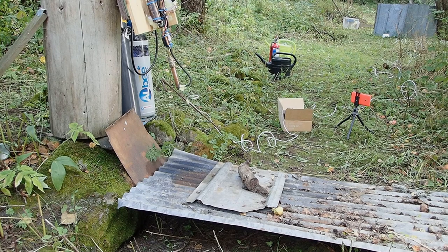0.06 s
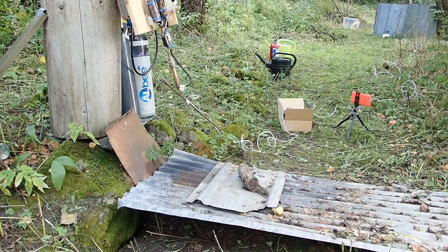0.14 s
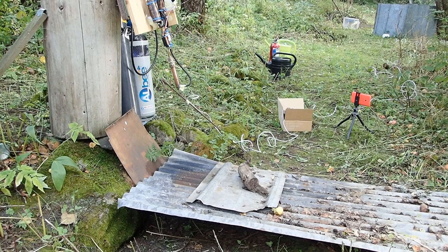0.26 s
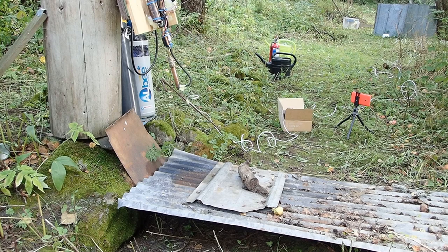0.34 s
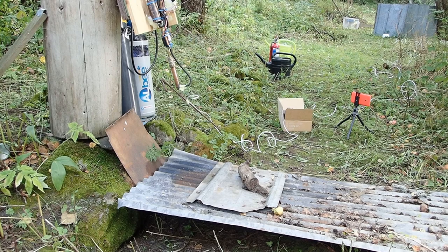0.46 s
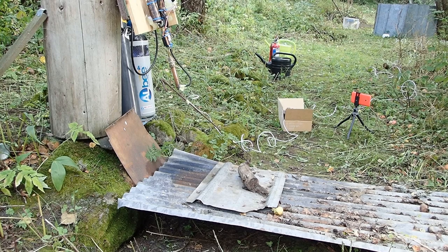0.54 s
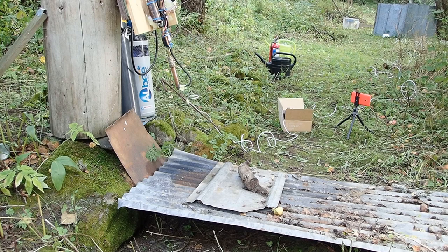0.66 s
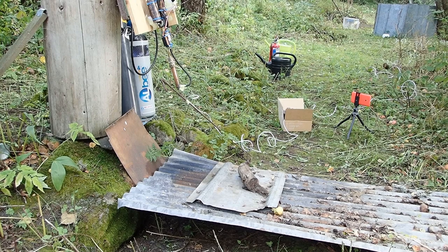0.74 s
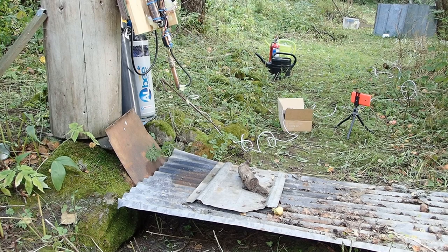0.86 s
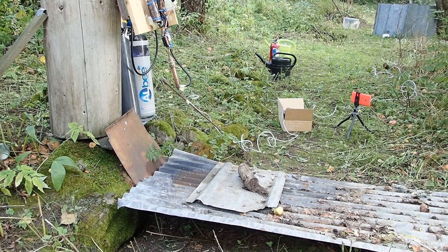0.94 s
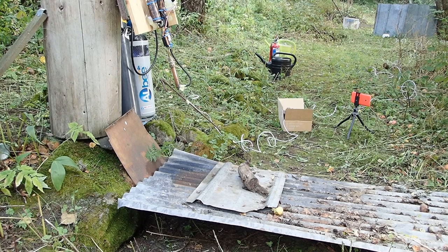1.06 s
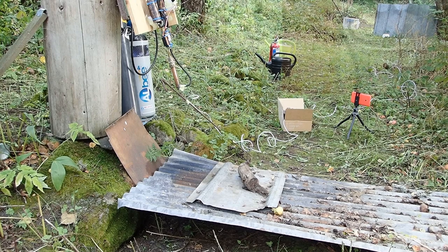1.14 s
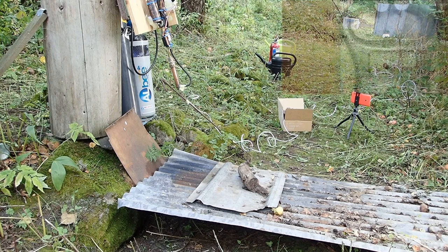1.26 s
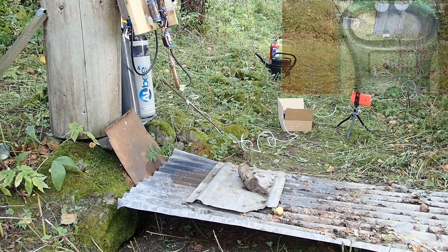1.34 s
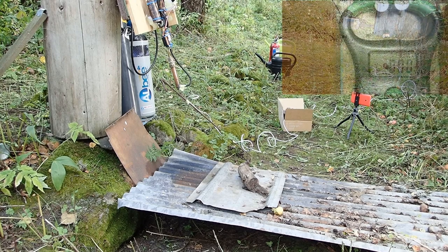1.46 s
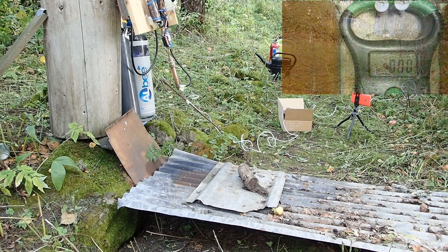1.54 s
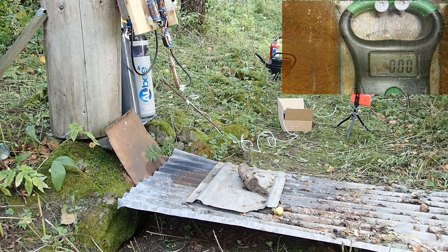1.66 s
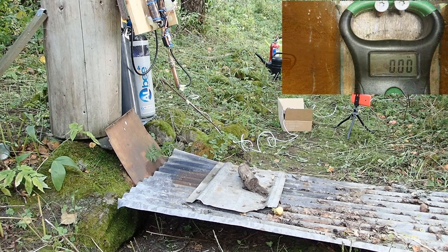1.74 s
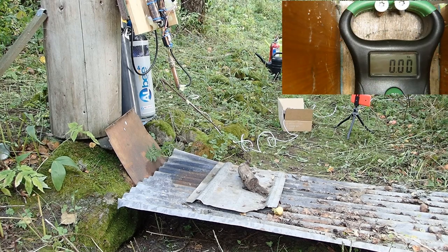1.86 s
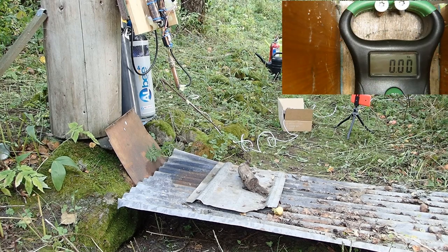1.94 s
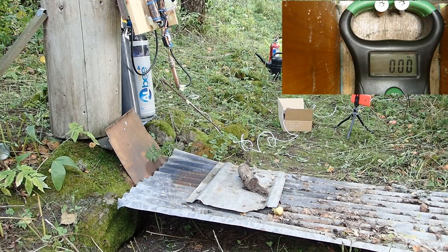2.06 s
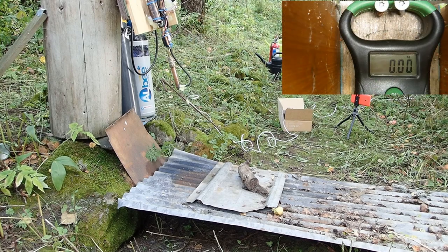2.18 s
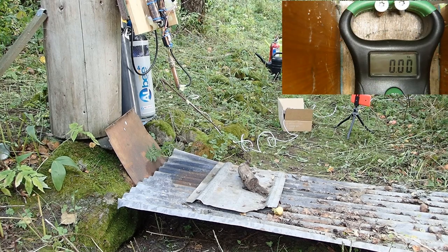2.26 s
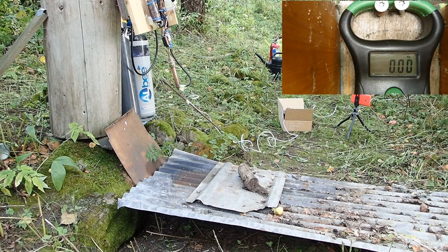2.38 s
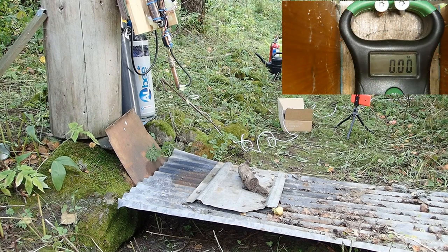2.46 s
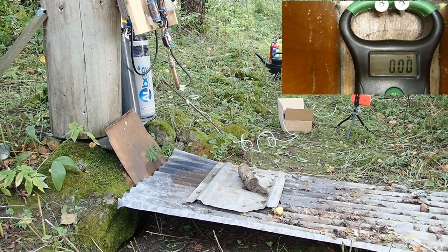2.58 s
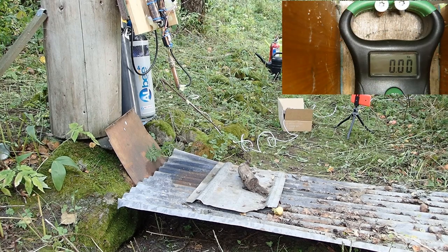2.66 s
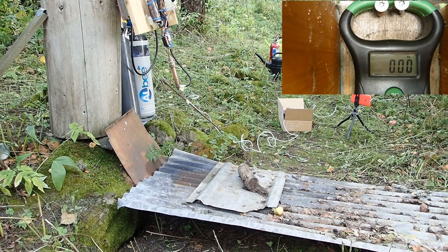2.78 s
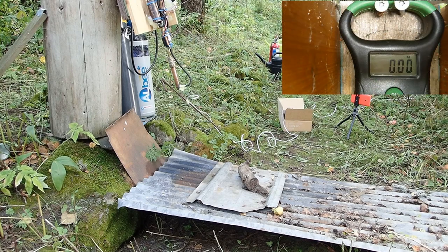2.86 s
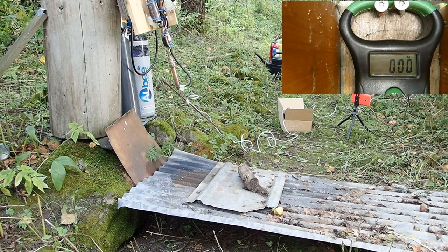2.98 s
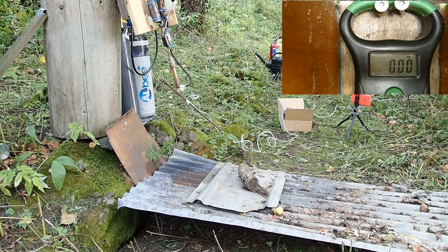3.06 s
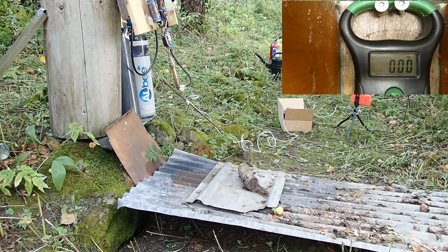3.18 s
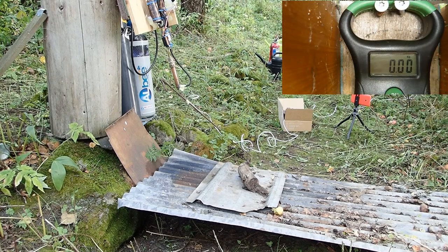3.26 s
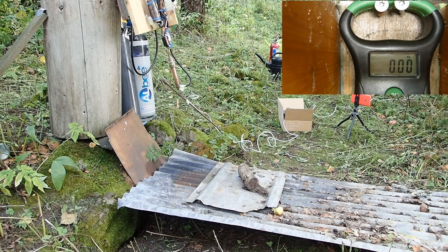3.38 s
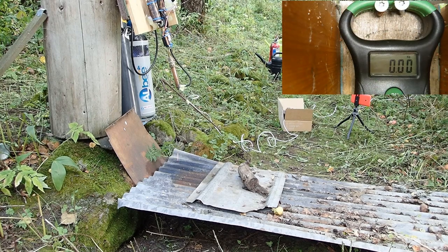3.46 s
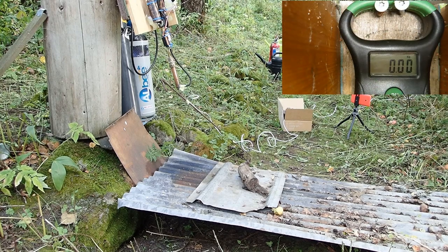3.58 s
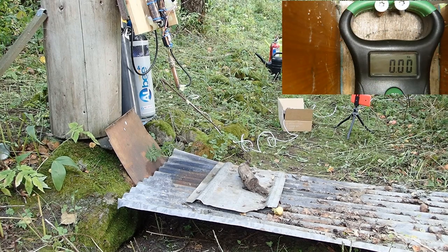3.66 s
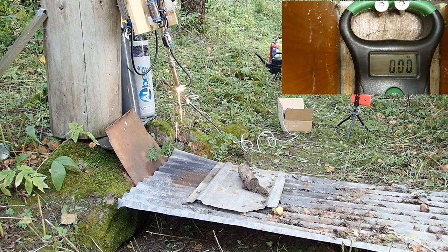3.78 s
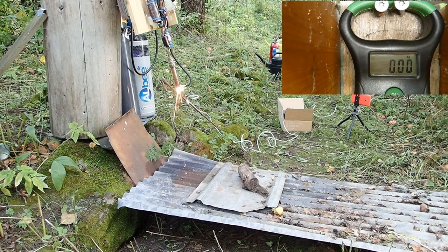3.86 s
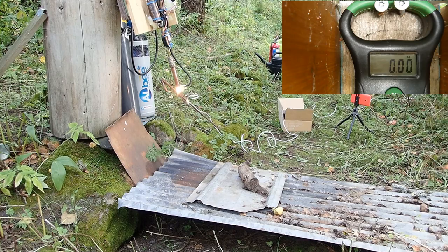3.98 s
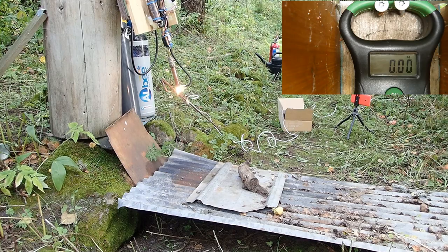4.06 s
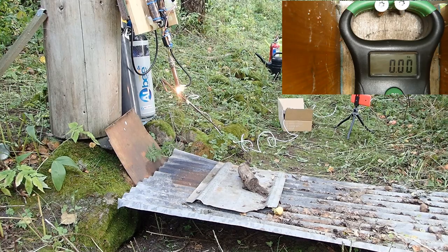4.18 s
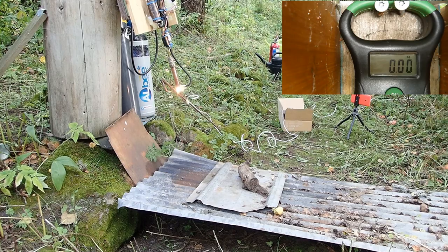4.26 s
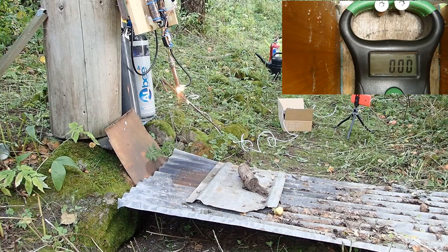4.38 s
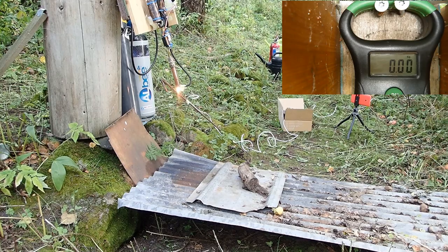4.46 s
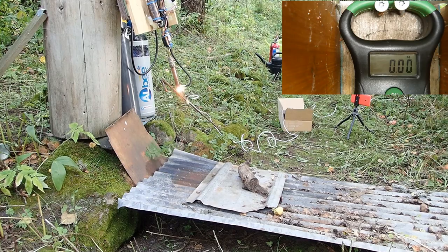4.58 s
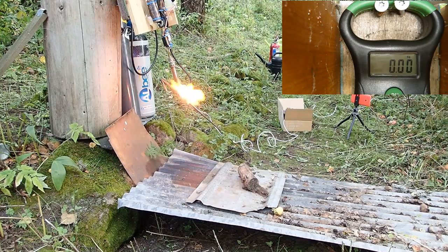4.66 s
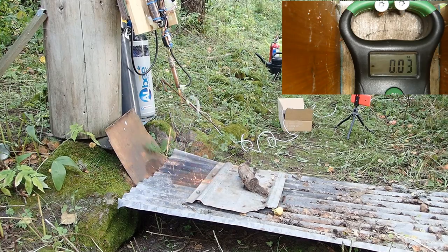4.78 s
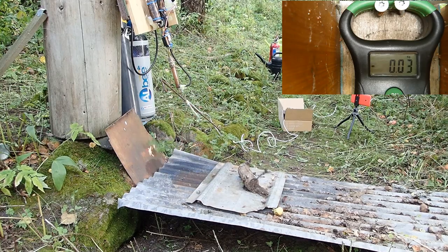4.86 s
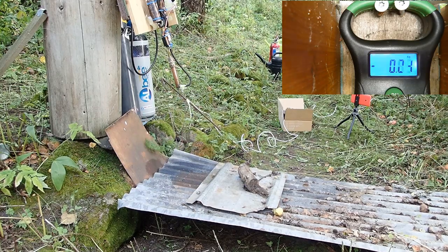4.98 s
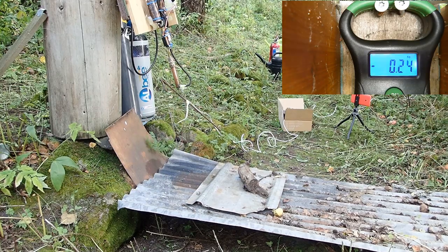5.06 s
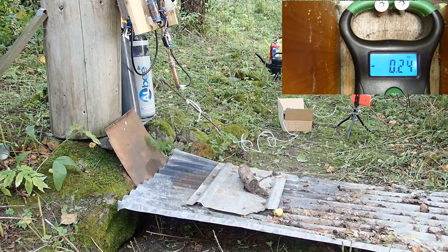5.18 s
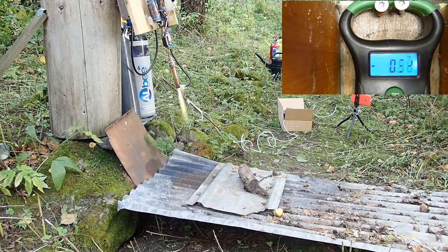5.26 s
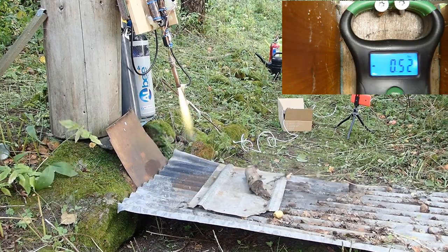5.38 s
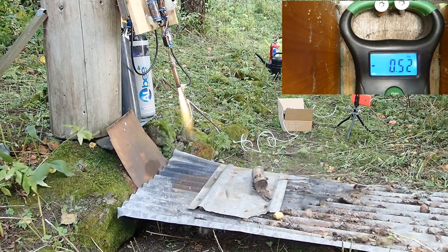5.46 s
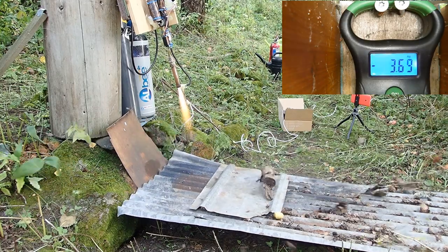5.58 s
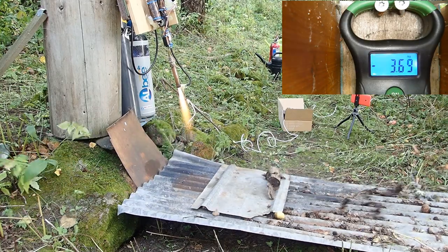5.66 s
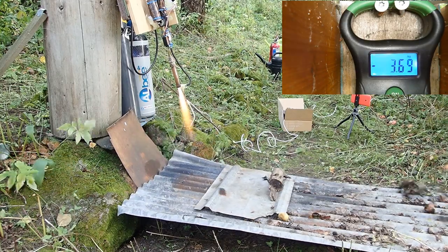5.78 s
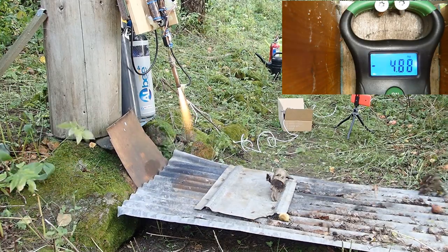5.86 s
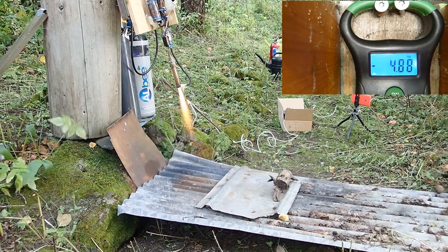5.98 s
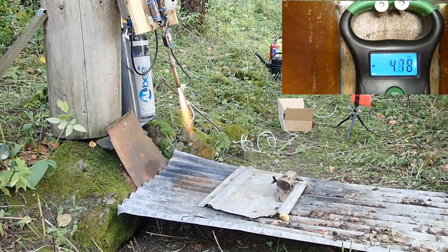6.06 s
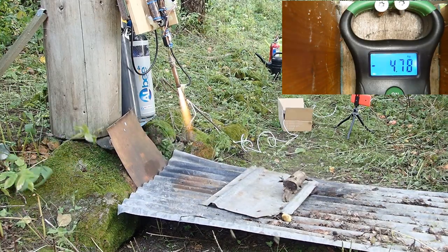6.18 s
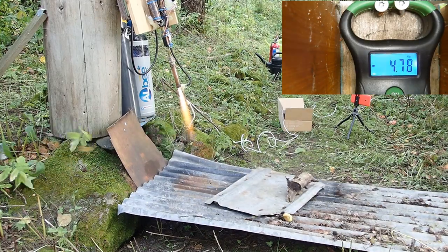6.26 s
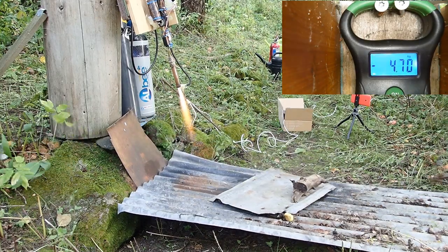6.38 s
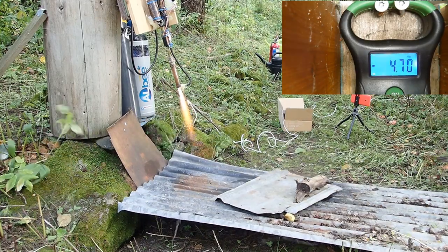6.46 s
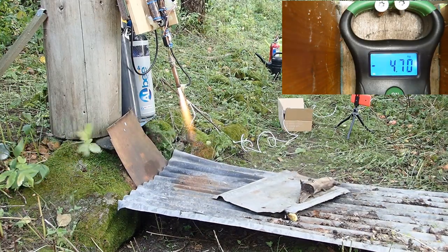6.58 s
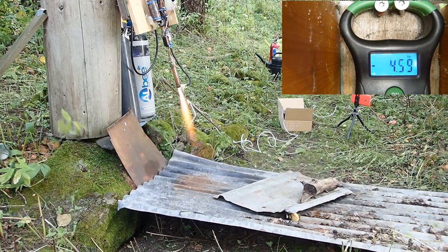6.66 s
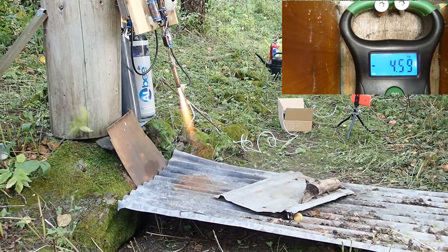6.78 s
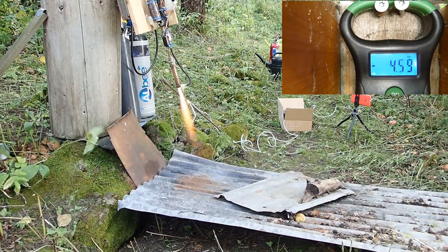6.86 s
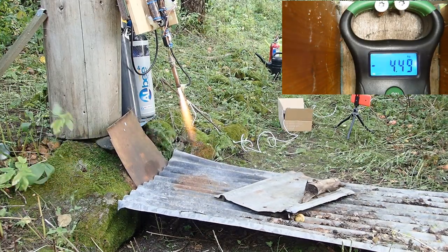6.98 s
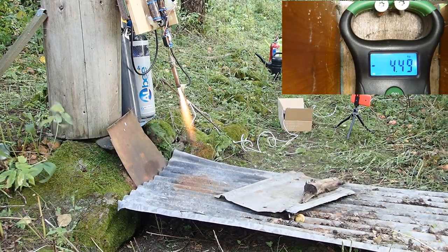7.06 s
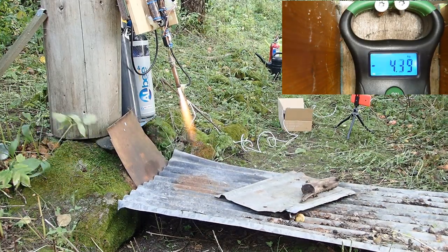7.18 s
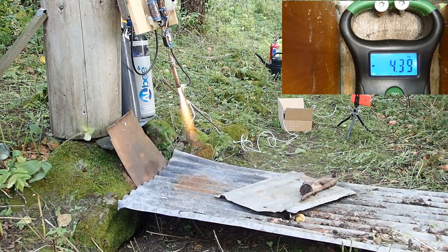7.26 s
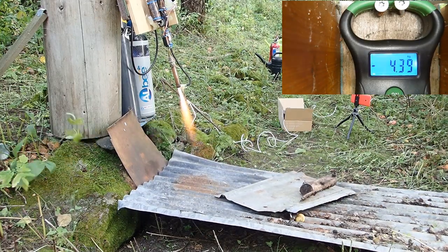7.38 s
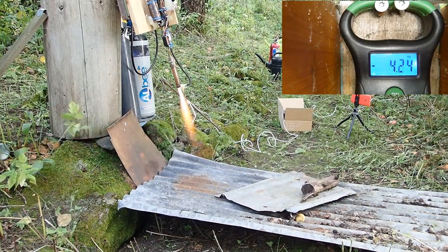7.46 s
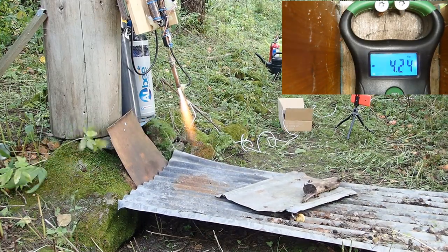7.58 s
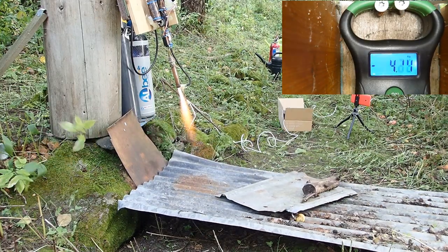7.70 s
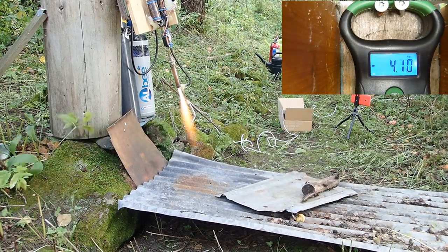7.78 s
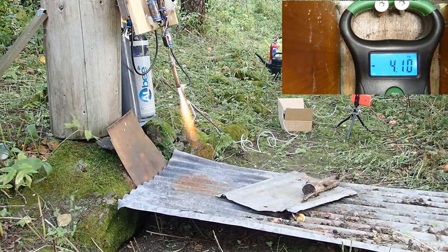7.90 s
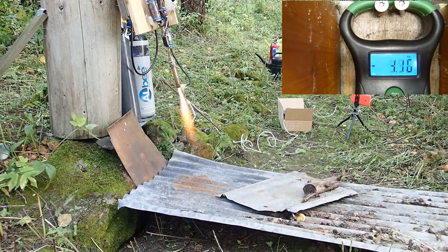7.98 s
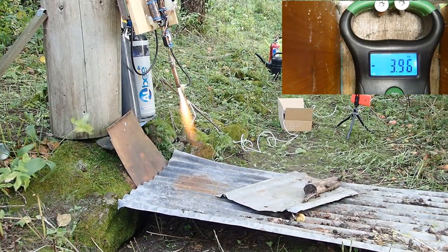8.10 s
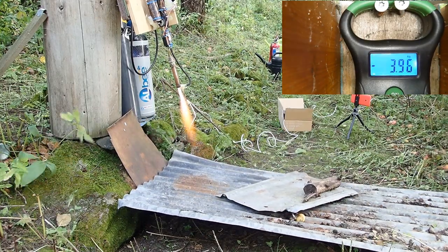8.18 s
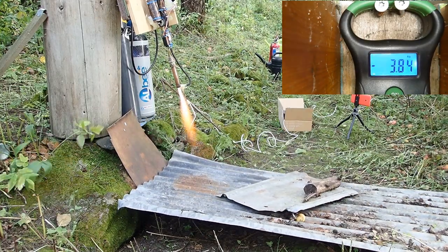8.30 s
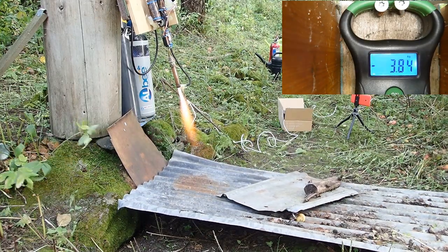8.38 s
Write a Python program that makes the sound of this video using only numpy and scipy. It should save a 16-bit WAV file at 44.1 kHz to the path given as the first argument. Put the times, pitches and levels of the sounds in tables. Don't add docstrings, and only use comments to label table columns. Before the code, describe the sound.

Outdoors in a garden, soft wind rumble and a thin camera-motor whine. A bright, resonant gas hiss opens abruptly and holds, then shifts upward into a hollow, unstable howl. A hard pop is followed by sputtering flame, a rising whistle and sharp cracks, then rapid chugging. It settles into a loud, bright jet roar with a falling tone. Stereo microphone a few metres away.

```python
import sys
import numpy as np
from scipy import signal
from scipy.io import wavfile
from scipy.ndimage import uniform_filter1d, map_coordinates

SR = 44100
rng = np.random.default_rng(int(sys.argv[2]) if len(sys.argv) > 2 else 0)


def invert_db(x):
    u = np.asarray(x, float) / 20
    return 10 ** u


def file_out(sig):
    cols = np.atleast_2d(sig).T
    lim = np.clip(cols, -1, 1)
    pcm = np.round(lim * 32767).astype(np.int16)
    wavfile.write(sys.argv[1], SR, pcm)


N = 371763
FRAME = 1024

# freq_hz, density_db
JET_SPECTRUM = [(1350, -20), (2300, -20.5), (3120, -27.5), (3440, -21), (4130, -21), (4740, -9.5),
                (5340, -4), (6330, -2), (7430, -6), (8650, 0), (9450, -4.5), (10600, -16.5), (14100, -15.5),
                (15700, -22.5)]
# freq_hz, density_db
BODY_SPECTRUM = [(410, -11), (700, -5.5), (882, -6.5), (1000, 3.5), (1090, 3), (1440, 5), (1910, -2),
                 (2070, -2), (2390, -25.5), (3000, -20.5), (3900, -10.5), (6600, -120)]
# freq_hz, coherence
PORT_COHERENCE = [(60, 0.08), (130, 0.19), (290, 0.87), (640, 0.86), (1410, 1.0), (3100, 0.94),
                  (6820, 0.66), (15000, 0.39)]


def unit(x):
    return x / np.sqrt(np.mean(x ** 2) + 1e-20)


def along(points, hz):
    f, v = np.transpose(points)
    return np.interp(np.log(hz + 1), np.log(f + 1), v)


def curves(rows, fade=0.0045):
    s, *columns = np.transpose(rows)
    t = np.arange(N) / SR
    gate = np.clip(np.minimum(t - s[0], s[-1] - t) / fade + 1, 0, 1)
    return [gate] + [np.interp(t, s, column) for column in columns]


def wobble(rate, size=16):
    knots = rng.standard_normal(int(N * rate / SR) + 4)
    coarse = map_coordinates(knots, [np.arange(0, N + size, size) * rate / SR])
    return np.interp(np.arange(N) / size, np.arange(len(coarse)), coarse)


def rush(power, alike, patchy_db=0.0, gate=None):
    # freq_hz, left_lead_rad
    phase_lead = [(0, 0), (600, 0.1), (4390, 0.0), (5250, 0.6), (8440, 0.5), (14200, 1.4), (15400, 0.2)]
    # freq_hz, left_minus_right_db
    balance = [(60, -5.5), (180, -2.5), (550, 0), (1650, 0.0), (4970, 0.5), (15000, 2.5)]
    start, end = (0, N) if gate is None else np.flatnonzero(gate)[[0, -1]]
    hz, t, z = signal.stft(rng.standard_normal((2, end - start)), SR, nperseg=FRAME)
    at = np.minimum(start + t * SR, N - 1).astype(int)
    shape = power(hz[:, None], at) * np.ones(z.shape[1:])

    patches = uniform_filter1d(rng.standard_normal(shape.shape), 10, 0)
    patches = uniform_filter1d(patches, 6, 1)
    z = z * np.sqrt(shape / shape.mean(0)) * invert_db(patchy_db * unit(patches))

    lead_rad = along(phase_lead, hz)
    coherence = along(alike, hz) / np.maximum(np.cos(lead_rad), 0.4)
    angle = np.arccos(np.clip(coherence, -1, 1))[:, None] / 2
    mid, side = z[0] * np.cos(angle), z[1] * np.sin(angle)
    tilt = (invert_db(along(balance, hz) / 2) * np.exp(0.5j * lead_rad))[:, None]
    stereo = np.array([(mid + side) * tilt, (mid - side) / tilt])
    pair = signal.istft(stereo, SR, nperseg=FRAME)[1][:, :end - start]
    return np.pad(pair, ((0, 0), (start, N - end)))


def steady(spectrum):
    return lambda hz, at: invert_db(along(spectrum, hz)) ** 2 * np.minimum(hz / spectrum[0][0], 1) ** 6


def peak(hz, centre, width, steep=1.88):
    return 1 / (1 + (2 * (hz - centre) / width) ** 2) ** steep


def singing(hz, width, steadiness):
    sway = steadiness + wobble(width) + 1j * wobble(width)
    phase = 2 * np.pi * np.cumsum(hz * np.ones(N)) / SR
    return unit(np.real(sway * np.exp(1j * phase)))


def flame():
    # start_s, jet_db, outer_db
    thrust = [(3.87, -23.5, -3), (3.93, -32.5, 0.5), (4.06, -27, 1), (4.25, -17.5, 0.5), (4.48, -11.5, -6),
              (4.6, -11, -11.5), (4.7, -11.5, -13), (4.8, -10.5, -18), (4.97, -14.5, -21.5),
              (5.13, -17.5, -18), (5.165, -17.5, -29), (5.24, -18, -30), (5.3, -15, -28),
              (5.385, -13.5, -22), (5.402, -8, -12.5), (5.57, -14, -14), (6.78, -14, -12.5),
              (8.43, -14, -12.5)]
    # freq_hz, density_db
    low_spectrum = [(150, -54), (250, -18), (446, -9), (730, -11), (858, -4), (900, -5.5), (1170, -30),
                    (1980, -120)]
    # freq_hz, density_db
    bass_spectrum = [(29, -40), (50, -13.5), (215, -0.5), (248, -4), (330, -4), (430, -5), (730, -120)]
    # freq_hz, coherence
    jet_coherence = [(60, 0.13), (130, 0.53), (290, 0.46), (640, 0.76), (1410, 0.93), (3100, 0.82),
                     (6820, 0.59), (15000, 0.24)]
    # start_s, pulses_per_s
    chug_rate = [(4.71, 43), (4.83, 73), (4.93, 85), (5.06, 101), (5.14, 96), (5.25, 72)]
    # start_s, pitch_hz, level_db
    screech_glide = [(4.9, 6460, -25), (4.98, 6830, -14.5), (5.05, 6360, -14), (5.13, 6640, -15),
                     (5.2, 6900, -19), (5.26, 6900, -43)]
    # start_s, level_db
    afterflow = [(3.88, -53), (3.95, -47), (4.1, -39), (4.3, -42), (4.5, -47)]
    t = np.arange(N) / SR
    gate, jet_db, outer_db = curves(thrust)
    seated = t > 4.71

    def flicker():
        depth_db = np.where(t < 5.4, 3, 1)
        return depth_db * wobble(35)

    body_db = jet_db + outer_db
    under_db = body_db + np.where(seated, -0.39 * (outer_db + 13), 0.8 * outer_db)
    low_db = under_db + np.where(seated, -6, -15.5) + flicker()
    bass_db = under_db + np.where(seated, -12, -25.5) + flicker()

    chug_depth = 0.35
    chugging, rate = curves(chug_rate, fade=0.02)
    cycle = np.cumsum(rate * (1 + 0.012 * wobble(30))) / SR % 1
    puff = np.exp(-cycle / 0.14) - 0.2
    chop = 1 + chugging * chug_depth * puff
    crackle = invert_db(0.38 * wobble(300) + 0.38 * wobble(60) + 0.12 * wobble(7.1))

    dull_db = 0.72 * np.clip(jet_db + 17.5, -14, 0)

    def jet_power(hz, at):
        return steady(JET_SPECTRUM)(hz, at) * invert_db(2 * dull_db[at] * np.log2(hz / 6500 + 0.4))

    def low_power(hz, at):
        hum = invert_db(2 * 9.5) * peak(hz, 330, 53)
        return steady(low_spectrum)(hz, at) * (1 + ~seated[at] * hum)

    jet = invert_db(jet_db) * crackle * chop ** 2.5 * rush(jet_power, jet_coherence, gate=gate)
    body_level = invert_db(body_db + 0.25 * wobble(90) + 0.17 * flicker())
    body = body_level * crackle * chop ** 3 * rush(steady(BODY_SPECTRUM), jet_coherence, gate=gate)
    low = invert_db(low_db) * chop ** 3 * rush(low_power, jet_coherence, gate=gate)
    bass_level = invert_db(bass_db) * (1 - 0.35 * chugging * chug_depth)
    bass = bass_level * rush(steady(bass_spectrum), jet_coherence, gate=gate)

    band = signal.butter(2, [130, 650], "band", fs=SR, output="sos")
    thump = chugging * invert_db(-41 + 0.2 * (rate - 101)) * unit(signal.sosfilt(band, puff))

    on, screech_hz, screech_db = curves(screech_glide)
    screech = rush(lambda hz, at: peak(hz, screech_hz[at], 643), jet_coherence, gate=on)
    screech = on * invert_db(screech_db) * chop ** 2 * screech
    flowing, hiss_db = curves(afterflow)
    injector = rush(lambda hz, at: peak(hz, 13600, 1100, steep=1.1), PORT_COHERENCE, gate=flowing)
    injector = flowing * invert_db(hiss_db) * injector
    return gate * (jet + body + low + bass) + thump + screech + injector


def chamber():
    # start_s, pitch_hz, level_db
    first_mode = [(5.38, 974, -43), (5.42, 950, -19), (5.52, 915, -33), (5.7, 905, -29), (6.15, 961, -29),
                  (6.5, 929, -28), (7.2, 880, -27), (7.55, 851.5, -21), (8.43, 770, -24.5)]
    lit, pitch_hz, level_db = curves(first_mode)

    def power(hz, at):
        second = invert_db(2 * -2) * peak(hz, 1.953 * pitch_hz[at], 136)
        return peak(hz, pitch_hz[at], 90) + second

    fuzz = rush(power, PORT_COHERENCE, gate=lit)
    tone = singing(pitch_hz, 80, steadiness=6)
    return lit * invert_db(level_db) * (0.68 * fuzz + 0.5 * tone)


def pops():
    # start_s, peak_db, crack_db, t60_s
    bursts = [
        (3.866, 6, 1, 0.017),
        (4.162, -12, -11, 0.02),
        (4.171, -8, -11, 0.023),
        (4.214, -14, -12, 0.018),
        (4.562, -4.5, -13, 0.05),
        (4.749, -4.5, 0, 0.026),
        (4.774, -9, -5, 0.023),
        (4.855, -12.5, -5, 0.072),
        (4.898, -11.5, 5, 0.035),
        (4.956, -22, 5, 0.02),
    ]
    out = np.zeros((2, N))
    age = np.arange(SR // 10) / SR
    gate = curves([(bursts[0][0], 0), (bursts[-1][0] + 0.2, 0)])[0]
    knock = rush(steady(BODY_SPECTRUM), PORT_COHERENCE, gate=gate)
    crack = rush(steady(JET_SPECTRUM), PORT_COHERENCE, gate=gate)
    for start_s, peak_db, crack_db, t60_s in bursts:
        start = round(start_s * SR)
        at = slice(start, start + len(age))
        decay = invert_db(peak_db - 5.5 - 60 * age / max(t60_s, 0.002))
        attack = 1 - np.exp(-age / 0.00068)
        out[:, at] += decay * attack * (knock[:, at] + invert_db(crack_db) * crack[:, at])
    return out


def howl():
    # start_s, level_db
    igniter = [(3.08, -46), (3.146, -29.5), (3.344, -38.5), (3.42, -27), (3.49, -27), (3.56, -23),
               (3.734, -21), (3.862, -22.5)]
    # first_hz, last_hz, width_hz, level_db
    chamber_modes = [(548, 645, 12, -4), (874, 960, 76, -1.5), (1290, 1286, 90, -1), (1140, 1175, 22, -3.5)]
    t = np.arange(N) / SR
    gate, level_db = curves(igniter)
    modes = 0
    for first_hz, last_hz, width_hz, mode_db in chamber_modes:
        glide_hz = np.interp(t, [3.1, 3.6], [first_hz, last_hz])
        sputter = invert_db(mode_db + 1.5 * wobble(30))
        modes = modes + sputter * rush(lambda hz, at: peak(hz, glide_hz[at], width_hz, steep=1.21),
                                       PORT_COHERENCE, gate=gate)

    since_lock = t - 3.74
    lock = np.clip(since_lock / 0.07, 0, 1)
    locked_db = -20 + 150 * np.clip(since_lock, 0, 0.065)
    locked = lock * invert_db(locked_db) * singing(glide_hz, 60, steadiness=3.4)

    plug_s, whistle_s, swell_s = 3.88, 0.34, 0.12
    late, age = curves([(plug_s, 0), (plug_s + whistle_s, whistle_s)])
    throb = 1 + 0.66 * np.cos(2 * np.pi * 42.2 * (t - 4.0))
    swell_db = -9 * np.clip(1 - age / swell_s, 0, 1)
    fade_db = -20 * np.maximum(age - swell_s, 0)
    whistle_hz = 1286 + 300 * age + 720 * age ** 2
    whistle = invert_db(-16 + swell_db + fade_db) * throb * singing(whistle_hz, 30, steadiness=6)
    return gate * (invert_db(level_db) * modes + locked) + late * whistle


def gas():
    # start_s, level_db
    flow = [
        (1.6, -74),
        (1.66, -34),
        (1.93, -21),
        (3.02, -20.5),
        (3.15, -25),
        (3.3, -25.5),
        (3.62, -23.5),
        (3.86, -25),
    ]
    # start_s, sound_speed_ratio
    heating = [(1.6, 1), (3.085, 1), (3.14, 1.68), (3.175, 1.8), (3.25, 1.55), (3.35, 1.4), (3.45, 1.57),
               (3.6, 1.72), (3.87, 1.98)]
    # freq_hz, width_hz, level_db, hot_change_db
    port_modes = [(1811, 55, -8, -3.5), (3220, 69, -17, -8.5), (4630, 95, -16, 0.5), (6036, 140, -8, -6),
                  (7540, 86, -3, -10), (8880, 160, -5.5, -16)]
    # freq_hz, width_hz, level_db
    plumbing_modes = [(1137, 55, -14), (2047, 25, -7), (4930, 82, -16), (5700, 70, -17), (6530, 32, -5.5),
                      (7120, 60, -35), (7900, 120, -32), (9130, 89, -6), (9550, 69, -8.5),
                      (9880, 95, -10.5), (10100, 400, -20), (10850, 280, -18), (11300, 500, -25),
                      (12040, 200, -19.5)]
    # freq_hz, width_hz, level_db
    injector_modes = [(542.6, 27, -13.5), (770, 93, -28), (12740, 200, -14.5), (13200, 200, -14),
                      (13920, 300, -7.5), (14350, 200, -15)]
    # freq_hz, density_db
    bed_spectrum = [(530, -50), (900, -28), (1820, -5.5), (2290, -24), (2870, -30.5), (3310, -19),
                    (4110, -24.5), (4570, -16), (6090, -12.5), (7030, -16.5), (7380, -8), (9150, -10.5),
                    (11500, -46), (14200, -10), (15700, -31)]
    # freq_hz, width_hz
    null_slots = [(2420, 62), (2880, 250), (3720, 100), (4200, 290)]
    gate, level_db = curves(flow)
    speed = curves(heating)[1]
    hot = np.clip((speed - 1) / 0.4, 0, 1)
    plumbing_db = -1 * hot
    bed_db = -12.5 + 3 * hot
    dull_db = np.interp(np.arange(N) / SR, [1.7, 2.05], [-3, 0])

    def colour_db(hz):
        return np.clip(along(JET_SPECTRUM, np.maximum(hz, 2100)), -30, 0)

    def still(modes, hz):
        return sum(invert_db(2 * db) * peak(hz, centre, width) for centre, width, db in modes)

    def power(hz, at):
        port = 0
        for cold_hz, width_hz, cold_db, hot_db in port_modes:
            change_db = (hot_db + 3 * wobble(14)[at]) * hot[at]
            mode_db = cold_db - colour_db(cold_hz) + change_db
            resonance = peak(hz, cold_hz * speed[at], width_hz * speed[at] ** 2.8)
            port = port + invert_db(1.99 * mode_db) * resonance
        total = still(plumbing_modes, hz) * invert_db(2 * plumbing_db[at]) + still(injector_modes, hz)
        total = total + port * invert_db(2 * colour_db(hz))
        total = total + invert_db(2 * (along(bed_spectrum, hz) + bed_db[at]))
        for centre, width in null_slots:
            total = total * (1 - 0.98 * peak(hz, centre, width))
        rolloff = 1 / (1 + (hz / 15150) ** 200)
        return total * rolloff * invert_db(2 * dull_db[at] * np.log2(hz / 6500 + 0.035))

    flutter = invert_db(0.2 * wobble(30.08) + 0.16 * wobble(130))
    return gate * invert_db(level_db) * flutter * rush(power, PORT_COHERENCE, patchy_db=1.0, gate=gate)


def garden():
    # freq_hz, density_db
    hiss_spectrum = [(71, -29), (120, -14), (282, -3.5), (375, -6), (676, -10.5), (829, -6.5), (1080, -7.5),
                     (3170, -29.5), (4220, -24), (5060, -10.5), (6460, -7), (7010, -12), (9130, -10.5),
                     (10700, -26), (15500, -26)]
    # freq_hz, density_db
    rumble_spectrum = [(12, -42), (20, -12), (27, -8), (81, 5), (140, 1.5), (200, -4.5), (260, -45),
                       (440, -120)]
    # start_s, level_db
    ducking = [(0, -51), (.06, -43.5), (3.4, -41), (3.9, -58), (8.43, -68)]
    # pitch_hz, level_db
    motor_lines = [(371.4, -62), (737.5, -83), (5168, -69), (5534, -72), (5900, -59), (6272, -55),
                   (6643, -61.5), (7004, -73), (7381, -70), (7747, -79), (8118, -72), (8856, -66),
                   (9222, -69), (9959, -98)]
    # freq_hz, coherence
    quiet_coherence = [(60, -0.24), (130, 0.46), (290, 0.4), (640, 0.85), (1410, 0.8), (3100, 0.72),
                       (6820, 0.37), (15000, -0.28)]
    t = np.arange(N) / SR
    level_db = curves(ducking)[1]
    whine = 0
    for pitch_hz, line_db in motor_lines:
        whine = whine + invert_db(line_db + 3 + 2 * wobble(8)) * np.sin(2 * np.pi * pitch_hz * t)
    hiss = rush(steady(hiss_spectrum), quiet_coherence, patchy_db=0.5)

    lumps = invert_db(2.2 * np.array([wobble(6.6), wobble(8.1)]))
    gust_db = -47.5 + 0.53 * (level_db - level_db.max()) + 3.5 * wobble(11)
    wind = invert_db(gust_db) * unit(lumps * rush(steady(rumble_spectrum), quiet_coherence))
    return invert_db(level_db) * (hiss + invert_db(42) * whine) + wind


def scene():
    return flame() + chamber() + pops() + howl() + gas() + garden()


def low_pass(x):
    return signal.sosfilt(signal.butter(12, 15820, fs=SR, output="sos"), x)


def record(dry):
    mix = dry / (1 + np.abs(dry / 0.96) ** 6) ** (1 / 6)
    return low_pass(mix)


dry = scene()
out = record(dry)
file_out(out)
```